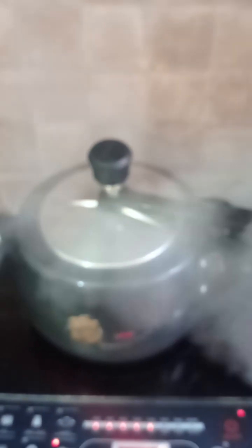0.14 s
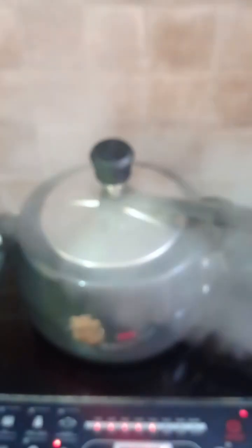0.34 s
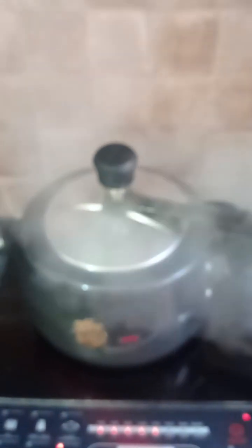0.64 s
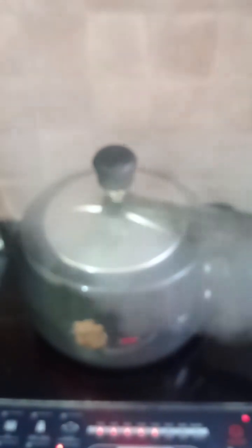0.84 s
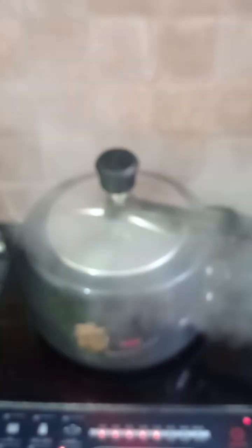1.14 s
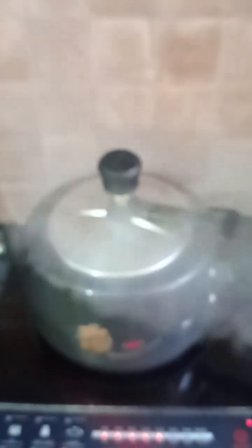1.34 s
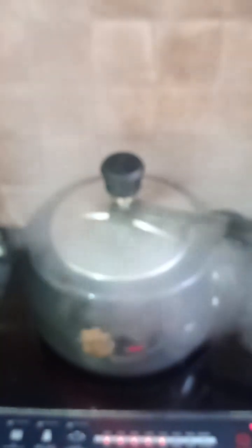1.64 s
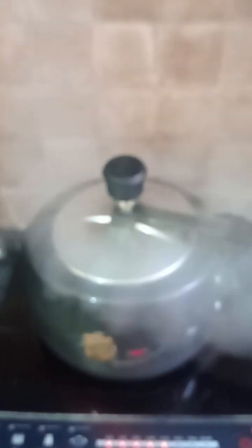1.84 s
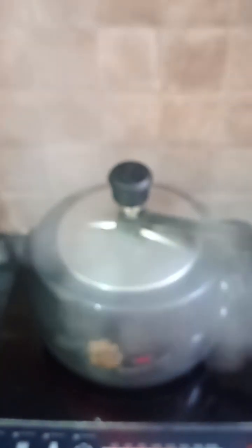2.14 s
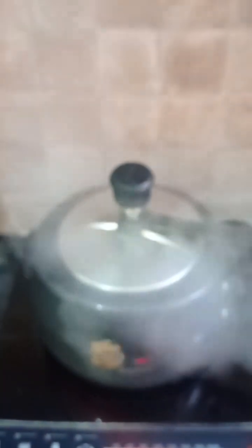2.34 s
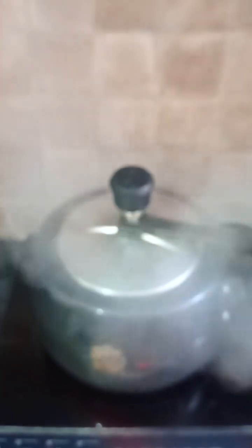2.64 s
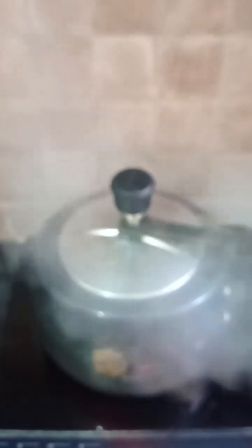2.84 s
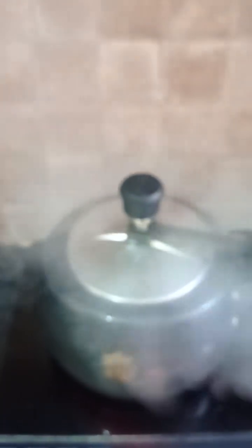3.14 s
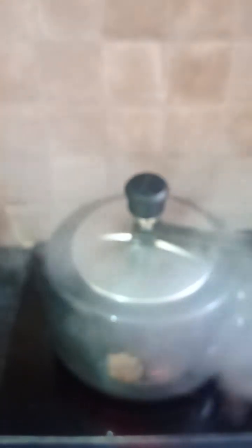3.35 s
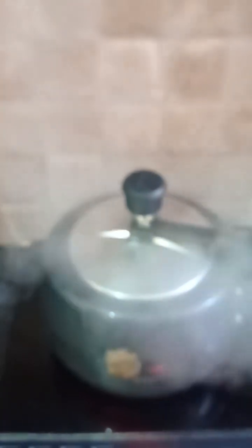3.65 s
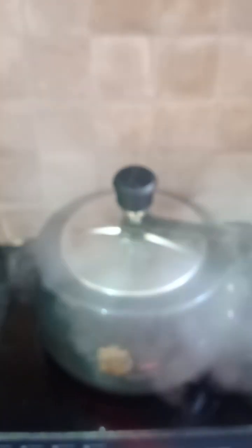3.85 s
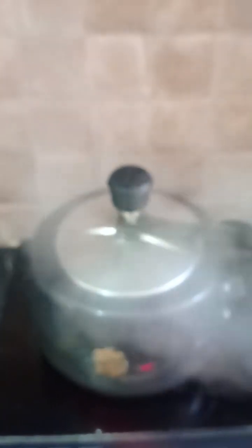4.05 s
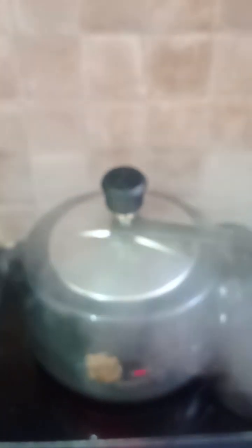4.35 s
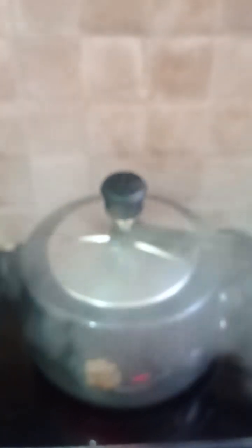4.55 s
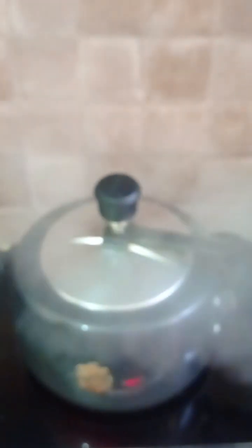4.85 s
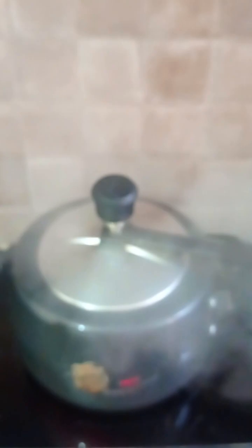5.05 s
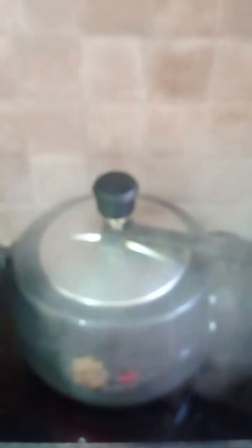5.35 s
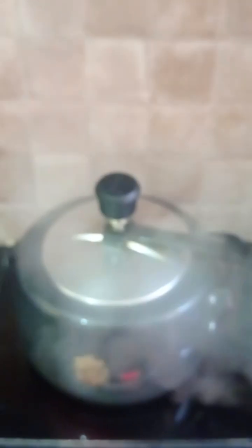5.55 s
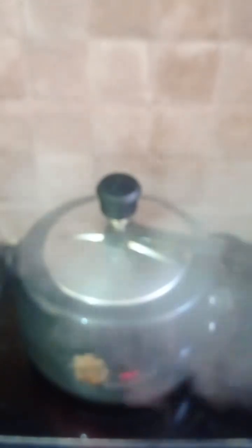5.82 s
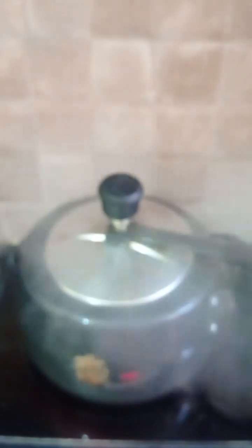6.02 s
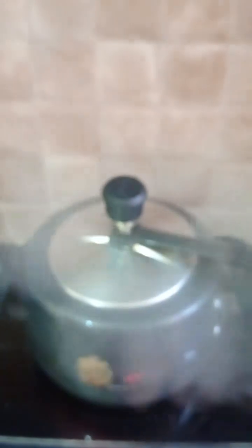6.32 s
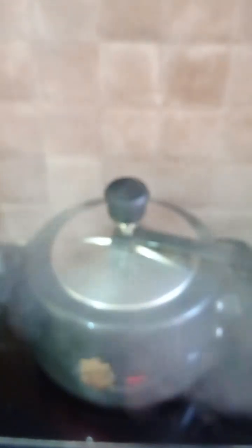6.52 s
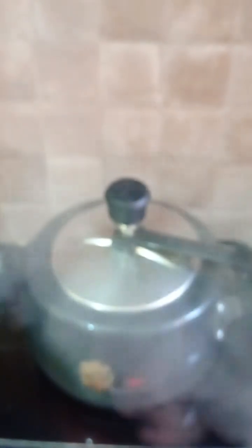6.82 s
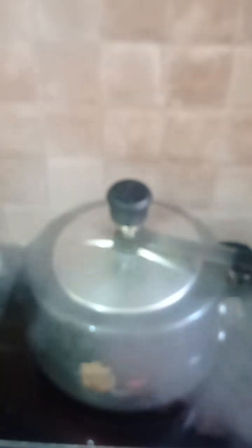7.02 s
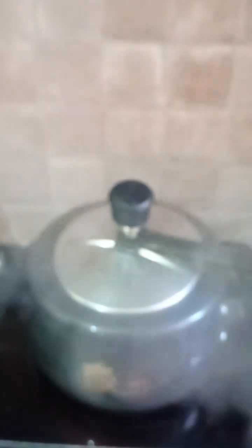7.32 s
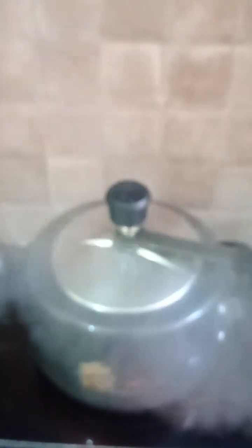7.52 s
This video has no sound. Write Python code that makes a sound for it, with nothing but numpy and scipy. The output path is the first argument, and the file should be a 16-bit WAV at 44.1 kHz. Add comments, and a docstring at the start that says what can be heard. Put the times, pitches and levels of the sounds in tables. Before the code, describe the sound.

In a tiled kitchen, a pressure cooker on a hob blasts steam continuously, heard from very close. The hiss is bright and piercing, with two breathy, wavering tones inside it and a thin screech on top. Low puffs and small wet spits flutter beneath, mostly in the first five seconds. A faint breathy whistle joins early, then the whole jet gradually loses force without stopping.

```python
"""Steam from a pressure cooker

A pressure cooker on a hob blows off steam under its weight, close by in a tiled kitchen.
The jet is noise in registers, shaped by the vent's resonances; it eases as the pressure falls.
The vent sings two breathy notes, with a thin screech on top and later a faint whistle.
The plume is low noise that puffs unevenly, drops spit as short decaying bursts,
and the hob's fan hums faintly underneath as a sine with a soft whirr."""
import sys
import numpy as np
from scipy.fft import rfft, irfft
from scipy.io import wavfile

SR = 44100
rng = np.random.default_rng(int(sys.argv[2]) if len(sys.argv) > 2 else 0)


def wav_out(sig):
    """Save sig, one row per channel (or a flat mono array), as 16-bit PCM at SR to the path in sys.argv[1]."""
    wavfile.write(sys.argv[1], SR, np.round(np.clip(np.atleast_2d(sig).T, -1, 1) * 32767).astype(np.int16))


N = 338688
TIME = np.arange(N) / SR
HZ = np.maximum(np.fft.rfftfreq(N, 1 / SR), 1)
CUTOFF_HZ = 15750


def from_db(db):
    """Logarithmic level: decibels to amplitude gain."""
    return 10 ** (np.asarray(db) / 20)


def rms_one(x):
    """Normalisation: scale to rms 1."""
    return x / np.sqrt(np.mean(x ** 2) + 1e-20)


def in_time(rows):
    """Linear interpolation: each column of a curve, at every sample."""
    s, *columns = np.transpose(rows)
    return [np.interp(TIME, s, c) for c in columns]


def hold(start, length, edge_s):
    """Gating envelope: rises, holds and falls, with each edge centred on its moment."""
    return np.clip(.5 + np.minimum(TIME - start, start + length - TIME) / edge_s, 0, 1)


def colour(points):
    """Spectral envelope: gain at every frequency, interpolated in dB over log frequency."""
    hz, db = np.transpose(points)
    return from_db(np.interp(np.log(HZ), np.log(hz), db))


def bell(hz, width):
    """Resonance curve: a peak of height 1 with its full width in Hz at half height."""
    return 1 / (1 + (2 * (HZ - hz) / width) ** 2)


def band(low, high, order=16):
    """Band-pass filtering: neighbouring bands add up to flat power."""
    return 1 / np.sqrt((1 + (low / HZ) ** (2 * order)) * (1 + (HZ / high) ** (2 * order)))


def noise(gain):
    """Filtered random noise: a fresh draw of a given colour, rms 1."""
    return rms_one(irfft(rfft(rng.standard_normal(N)) * gain, N))


def drift(rate):
    """Low-pass random fluctuation: about `rate` turns a second, spread 1."""
    return noise(1 / (1 + (np.fft.rfftfreq(N, 1 / SR) / rate) ** 2))


def flutter(x, depth_db, rate):
    """Turbulent amplitude modulation: the level shakes, then the rms is set to 1."""
    return rms_one(x * from_db(depth_db * drift(rate)))


def whirr(hz, width_hz):
    """Resonant filtering: noise caught in one resonance, rms 1."""
    return noise(bell(hz, width_hz))


def breathy_tone(hz, width_hz):
    """Quadrature modulation: narrow-band turbulence around a moving pitch, rms 1."""
    phase = 2 * np.pi * np.cumsum(hz) / SR
    grain = bell(0, width_hz) ** 2
    return rms_one(noise(grain) * np.cos(phase) + noise(grain) * np.sin(phase))


def echoes(x, echo_db, shortest_s, longest_s, sway_s, count):
    """Comb interference: reflections on swaying paths make fine peaks come and go; the level is kept."""
    out = x.copy()
    for delay in shortest_s + (longest_s - shortest_s) * rng.random(count):
        path = np.round((delay + sway_s * drift(.2)) * SR).astype(int)
        sign = rng.choice([-1, 1])
        out += from_db(echo_db) * sign * x[(np.arange(N) - path) % N]
    return out * np.std(x) / np.std(out)


# flow of steam, easing as the pressure falls: (t/s, level/dB re the start)
FLOW = [(0, 0), (2, -0.9), (4.8, -2), (5.7, -3.5), (7.68, -5.5)]


def with_flow(law):
    """Power law of jet noise: a layer's level falls in proportion to the flow level."""
    full_db, slope = law
    return from_db(full_db + slope * in_time(FLOW)[0])


# broad colour of the jet: (f/Hz, spectral level/dB per Hz)
JET_COLOUR = [(700, -26.5), (1200, -18), (1700, -12.5), (1850, -5), (2250, -2.5), (2550, -3.5), (3200, 1),
              (3800, -3), (5200, -9.5), (7500, -5), (9300, -8), (13500, -11.5), (14800, -14), (15650, -11)]
# resonances of vent and lid, and notches from the near wall: (f/Hz, width/Hz, level/dB)
RESONANCES = [(1344, 76, 3.7), (1887, 30, 2.2), (2069, 47, 8.0), (2098, 140, -7.6), (2344, 37, 3.2),
              (2459, 67, 6.0), (2556, 60, 3.2), (2661, 94, 3.6), (2836, 30, 2.6), (2932, 36, -5.8),
              (3074, 45, 2.1), (3166, 70, 1.8), (3301, 30, 2.1), (3709, 111, -7.0), (3700, 35, 8.0),
              (4019, 46, 3.6), (4523, 452, 2.3), (5412, 188, 4.0), (6525, 544, 4.0), (6895, 197, -1.6),
              (7686, 268, 3.0), (8570, 482, 3.5), (9074, 224, -4.3), (10247, 109, 2.9), (10841, 232, 5.3),
              (12221, 173, -2.8)]


def vent_response():
    """Source and filter: the jet's broad colour with resonances and notches laid over it."""
    resonance_db = sum(db * bell(hz, width) for hz, width, db in RESONANCES)
    return colour(JET_COLOUR) * from_db(resonance_db)


# the two breathy notes move as the weight turns: (t/s, low f/Hz, high f/Hz, high over low level/dB)
NOTES = [(0, 2640, 3075, -0.5), (1.6, 2670, 3103, 0.2), (2.4, 2520, 3150, 0), (3.1, 2530, 3154, -3.5),
         (3.5, 2535, 3156, 1), (4.0, 2540, 3156, 0), (5.0, 2570, 3217, 0.5), (5.8, 2640, 3177, -2),
         (6.7, 2630, 3154, 3), (7.68, 2620, 3177, 2.5)]
# registers of the notes: (low f/Hz, high f/Hz)
LOW_NOTE, HIGH_NOTE = (2300, 2920), (2920, 3700)


def vent(response, note_db=-6.5, note_width_hz=75, wander_hz=6):
    """Power sharing: two wandering notes, each in its own band of hiss, split a constant power."""
    low_hz, high_hz, balance_db = in_time(NOTES)

    def note(hz, edges):
        """Tone in noise: a breathy note set in hiss, rms 1."""
        hiss = noise(response * band(*edges))
        tone = breathy_tone(hz + wander_hz * drift(1.995), note_width_hz)
        return rms_one(hiss + from_db(note_db) * tone)

    balance = from_db(balance_db)
    return (note(low_hz, LOW_NOTE) + balance * note(high_hz, HIGH_NOTE)) / np.hypot(1, balance)


# the roar below the notes: (t/s, level/dB)
ROAR_LEVEL = [(0, -40.5), (1.6, -40.5), (2.1, -39), (3.7, -39.5), (5.6, -41.5), (7.68, -50.5)]
# the vent's two notes together: (t/s, level/dB)
VENT_LEVEL = [(0, -30.5), (1.4, -30.6), (2.1, -32.5), (3.0, -32.5), (3.65, -35), (4.05, -31.5),
              (5.3, -32.5), (7.35, -35.5), (7.68, -34.2)]
# the rush above the notes: (t/s, level/dB)
RUSH_LEVEL = [(0, -36.5), (1.3, -36), (1.6, -38), (1.95, -36.4), (3.3, -37), (4.3, -39.5), (5.8, -39.3),
              (6.4, -40), (7.38, -39.5), (7.52, -36.8)]
# registers of the jet: (low f/Hz, high f/Hz)
BODY, ROAR = (1250, 1750), (1750, 2300)
RUSH, HISS, SIZZLE = (3700, 6200), (6200, 11300), (11300, 14000)
# layers that follow the flow: (level/dB at full flow, slope in dB per dB of flow)
BODY_LAW, HISS_LAW, SIZZLE_LAW = (-48, 0.96), (-34, 0.39), (-40.5, 0.69)


def jet(response, waver_db=0.3, wavers_per_s=2.5):
    """Eddy scaling: large eddies roar and small ones hiss; the vent sings between them."""
    roar_gain, vent_gain, rush_gain = (
        from_db(in_time(curve)[0]) for curve in (ROAR_LEVEL, VENT_LEVEL, RUSH_LEVEL))
    body, roar, rush, hiss, sizzle = (
        noise(response * band(*edges)) for edges in (BODY, ROAR, RUSH, HISS, SIZZLE))
    middle = with_flow(BODY_LAW) * body + roar_gain * roar + vent_gain * vent(response)
    treble = rush_gain * rush
    treble += with_flow(HISS_LAW) * flutter(hiss, waver_db, wavers_per_s)
    treble += with_flow(SIZZLE_LAW) * flutter(sizzle, waver_db, wavers_per_s)
    # the lid mirrors the short waves and combs them
    treble = echoes(treble, echo_db=-18, shortest_s=.0015, longest_s=.007, sway_s=.00003, count=5)
    # all share a slight unsteadiness of the flow
    unsteadiness = from_db(0.33 * drift(25))
    return (middle + whistle() + treble) * unsteadiness


# the screech swells as the weight shifts on its seat: (start t/s, length t/s, level/dB over usual)
SWELLS = [(-0.03, 0.12, 4), (0.2, 0.14, 4), (0.85, 0.42, 3.5), (1.13, 0.1, 2), (1.43, 0.22, 4),
          (1.7, 0.31, 2.5), (3.62, 0.28, 2), (5.411, 0.15, 7), (5.6, 0.44, 4.5), (6.1, 0.17, 2.5),
          (6.57, 0.39, 2.5), (7.231, 0.07, 4.5)]
SWELL_EDGE_S = 0.07
SCREAM = (14000, 16000)  # register: (low f/Hz, high f/Hz)
SCREECH_LAW = (-37, 0.7)  # (level/dB at full flow, slope in dB per dB of flow)


def screech(response, tone_hz=14880, tone_width_hz=650, wander_hz=110, tone_db=-3):
    """Gap tone: the narrow gap under the weight sings a rough, wandering tone in a band of hiss."""
    swell_db = sum(db * hold(s, length, SWELL_EDGE_S) for s, length, db in SWELLS)
    tone = breathy_tone(tone_hz + wander_hz * drift(4.7), tone_width_hz)
    hiss = noise(response * band(*SCREAM, order=50) * (HZ < CUTOFF_HZ))
    rough = flutter(hiss + from_db(tone_db) * tone, depth_db=0.6, rate=25)
    return with_flow(SCREECH_LAW) * from_db(swell_db) * rough


# colours of the plume's bass and midrange: (f/Hz, spectral level/dB per Hz)
BUFFET_COLOUR = [(20, -27), (35, -20), (55, -6.5), (85, -0.5), (150, 0.5), (210, -1), (300, -15),
                 (600, -44)]
PUFF_COLOUR = [(120, -33), (220, -7), (320, 1), (480, -0.5), (680, 0), (900, -1.5), (1300, -4), (2000, -18),
               (4000, -50)]
# the puffing, which drops near five seconds, before lumps and lulls: (t/s, level/dB)
PUFF_LEVEL = [(0, -51.5), (1.9, -55.5), (3.1, -56), (4.92, -54.5), (5.0, -64), (6.6, -65), (7.68, -70)]
# larger gusts, least levels before lumps and lulls:
# (start t/s, length t/s, midrange puff level/dB, bass buffeting level/dB)
GUSTS = [(0.0, 0.2, -52, -57), (0.178, 0.14, -48, -54.5), (0.58, 0.07, -49, -60), (0.89, 0.11, -60, -60),
         (1.082, 0.14, -49, -60), (1.26, 0.11, -55, -61), (1.54, 0.038, -47.5, -63),
         (1.726, 0.14, -49, -58.5), (1.933, 0.095, -49, -58), (2.037, 0.051, -49.5, -61),
         (2.39, 0.05, -55, -67), (2.69, 0.13, -50.5, -67), (3.25, 0.06, -54, -70),
         (3.463, 0.053, -49.5, -56), (3.572, 0.03, -53, -59), (3.815, 0.073, -52, -67),
         (4.31, 0.051, -54, -66), (4.758, 0.047, -54, -64), (6.19, 0.05, -68, -67), (6.73, 0.25, -64, -67)]
# brief lulls: (start t/s, length t/s)
LULLS = [(0.392, 0.042), (0.71, 0.086), (1.02, 0.043), (1.377, 0.085), (2.245, 0.1), (3.02, 0.071),
         (3.94, 0.12)]
LULL_DB, GUST_EDGE_S = -4, 0.055
# layers that follow the flow: (level/dB at full flow, slope in dB per dB of flow)
BUFFET_LAW, WASH_LAW = (-65.5, 2.3), (-52.5, 1.1)


def plume(lump_db=1.5, lumps_per_s=35, puff_billow_db=2.0, buffet_billow_db=2.5, billows_per_s=11):
    """Intermittent turbulence: the wet cloud billows, gusts and lulls; lumps shake bass and midrange."""
    lumps = rms_one(from_db(lump_db * drift(lumps_per_s)))
    lulls = from_db(LULL_DB * sum(hold(s, length, GUST_EDGE_S) for s, length in LULLS))
    puff_billows = rms_one(from_db(puff_billow_db * drift(billows_per_s)))
    buffet_billows = rms_one(from_db(buffet_billow_db * drift(billows_per_s)))
    puff_gain = from_db(in_time(PUFF_LEVEL)[0]) * puff_billows
    buffet_gain = with_flow(BUFFET_LAW) * buffet_billows
    for s, length, puff_db, buffet_db in GUSTS:
        gust = hold(s, length, GUST_EDGE_S)
        puff_gain = np.maximum(puff_gain, from_db(puff_db) * gust)
        buffet_gain = np.maximum(buffet_gain, from_db(buffet_db) * gust)
    buffet = buffet_gain * noise(colour(BUFFET_COLOUR) * band(10, 900, order=2))
    # droplets make the puffs grainy
    spray = flutter(rng.standard_normal(N), depth_db=3.5, rate=430)
    puff = puff_gain * rms_one(irfft(rfft(spray) * colour(PUFF_COLOUR), N))
    # the spreading jet adds a soft wash, which dips half as many dB in the lulls
    wash = with_flow(WASH_LAW) * flutter(noise(band(710, 1490, order=6)), depth_db=1.5, rate=20)
    return lumps * lulls * (buffet + puff) + np.sqrt(lulls) * wash


HUM_HZ, HUM_DB = 277.5, -75.5


def hob(fan_hz=325, fan_width_hz=50, fan_db=-75):
    """Blade passing: the hob's cooling fan gives a steady blade tone and a soft whirr."""
    blades = np.sqrt(2) * np.sin(2 * np.pi * HUM_HZ * TIME)  # rms 1
    return from_db(HUM_DB) * blades + from_db(fan_db) * whirr(fan_hz, fan_width_hz)


# drops spat from the vent, before the common trim: (t/s, peak level/dB)
SPITS = [(0.894, -39), (1.108, -38), (1.559, -37), (1.969, -36), (2.699, -33.5), (2.929, -37),
         (6.297, -37.5)]


def spits(t60=0.047, trim_db=-4):
    """Exponential decay: a drop torn apart in the jet gives a dull burst, falling 60 dB in t60 seconds."""
    bursts = sum(from_db(db - 60 * np.maximum(TIME - s, 0) / t60) * (TIME >= s) for s, db in SPITS)
    return from_db(trim_db) * bursts * noise(band(280, 1800, order=2))


# the whistle sets in as the weight turns; its level is that before the fade
WHISTLE_START_S, WHISTLE_RISE_S, WHISTLE_DB, WHISTLE_FADE_DB_PER_S = 1.64, 0.25, -42, 2.9


def whistle(hz=4010, width_hz=300):
    """Resonant excitation: a faint breathy whistle that rises quickly and fades slowly."""
    age = np.maximum(TIME - WHISTLE_START_S, 0)
    rise = np.minimum(age / WHISTLE_RISE_S, 1)
    fading_gain = from_db(WHISTLE_DB - WHISTLE_FADE_DB_PER_S * age)
    return rise * fading_gain * whirr(hz, width_hz)


def scene():
    """Superposition: steam echoing off the tiles, plume, spits and hob add up, alike in both ears."""
    response = vent_response()
    steam = jet(response) + screech(response)
    steam = echoes(steam, echo_db=-23.5, shortest_s=.006, longest_s=.03, sway_s=.00009, count=14)
    centre = steam + plume() + spits() + hob()
    return np.array([centre, centre])


def record(dry):
    """Low-pass filtering: the top is cut steeply at CUTOFF_HZ."""
    return irfft(rfft(dry) * band(1, CUTOFF_HZ, order=300), N)


dry = scene()
out = record(dry)
wav_out(out)
```